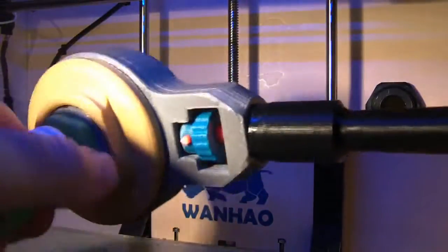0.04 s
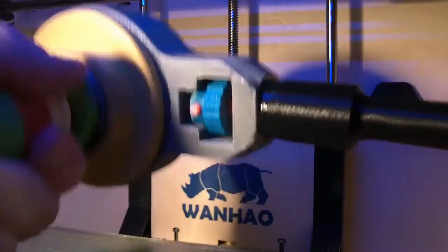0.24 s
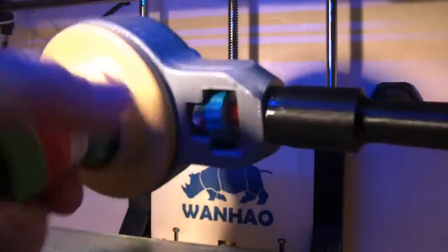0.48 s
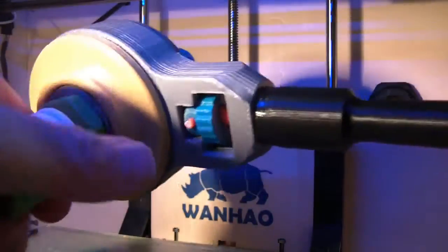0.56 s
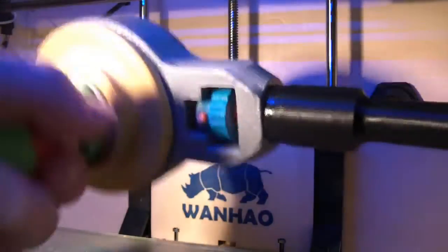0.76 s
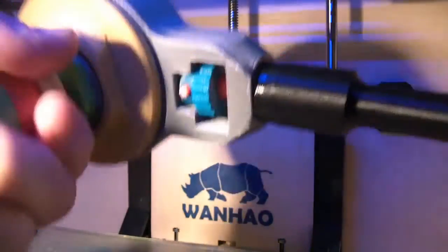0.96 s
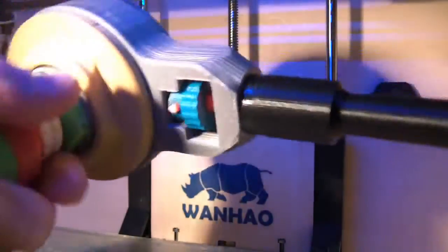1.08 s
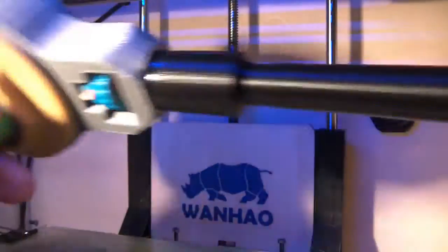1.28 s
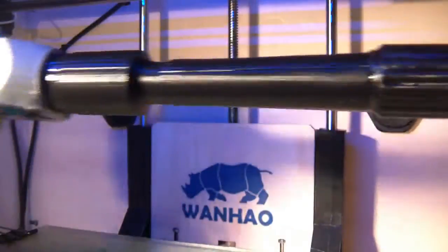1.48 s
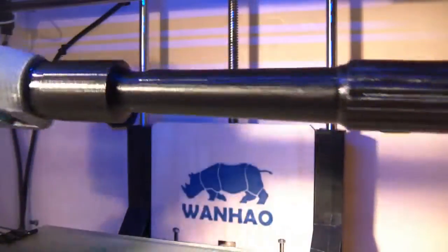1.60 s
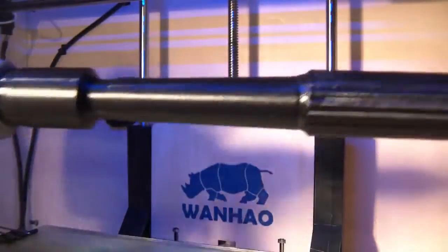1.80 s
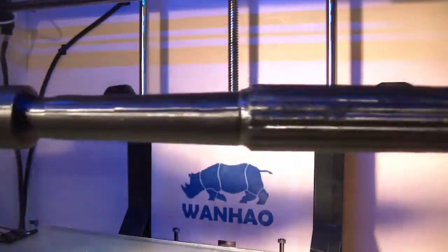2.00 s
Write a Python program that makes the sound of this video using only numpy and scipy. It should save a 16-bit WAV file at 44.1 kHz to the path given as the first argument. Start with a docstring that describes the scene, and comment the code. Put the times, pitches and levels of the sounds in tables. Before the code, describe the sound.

A plastic ratchet wrench clicks very close to the microphone, its loud snaps distorting. After a faint tick near 0.1 seconds, three creaky clacks come at about 0.25, 0.32 and 0.39, with brief rattles. Light ticks follow near 0.5, then three more clacks at 0.85, 0.9 and 0.98. Fan hum, motor whine and rushing air continue throughout and alone afterward, in a small hard room.

```python
"""Plastic ratchet wrench by a small fan

A printed plastic ratchet wrench is turned twice by hand, three teeth each time, in a small hard-walled space.
Slips of the pawl creak up each tooth; then it snaps down, and random impacts chatter on the ringing head.
A cooling fan hums as a stack of wavering tones, a second motor whines, and shaped noise makes moving air.
The wrench is so loud that the microphone overloads."""
import sys
import numpy as np
from scipy import signal
from scipy.io import wavfile
from scipy.ndimage import uniform_filter1d

SR = 44100
rng = np.random.default_rng(int(sys.argv[2]) if len(sys.argv) > 2 else 0)


def store_wav(level_fs):
    """Save 16-bit WAV to argv[1]."""
    pcm = np.round(np.clip(np.atleast_2d(level_fs), -1, 1) * 32767)
    wavfile.write(sys.argv[1], SR, pcm.T.astype(np.int16))


def ratio_of_db(decibels):
    """Turn decibels (scalar or array-like) into linear amplitude factors; 0 dB maps to 1."""
    return 10 ** (np.asarray(decibels, float) / 20)


N = 90404  # samples in the scene, about 2.05 s


def evened(x):
    """Scales a sound to rms 1."""
    return x / np.sqrt(np.mean(x ** 2) + 1e-20)


def read(points, hz):
    """Reads a (frequency, value) table along a logarithmic frequency axis."""
    table_hz, value = np.transpose(points)
    return np.interp(np.log(hz + 1), np.log(table_hz + 1), value)


def add(mix, start_s, sound):
    """Mixes in a two-channel sound from a start time."""
    part = mix[:, round(start_s * SR):][:, :sound.shape[1]]
    part += sound[:, :part.shape[1]]


def drift(top_hz):
    """Slow random wander of rms 1: twelve sines from 0.5 Hz up, the slow ones strongest."""
    t = np.arange(N) / SR
    rates = np.geomspace(.5, top_hz, num=12)
    return evened(sum(np.sin(2 * np.pi * (f * t + rng.random())) / np.sqrt(f) for f in rates))


def lean(db):
    """Gains that make the first channel louder than the second by db."""
    return ratio_of_db(np.array([[db], [-db]]) / 2)


# tones of the fan: (multiple of the shaft rate [1], rms level before wavering and leaning [dB])
FAN_ORDERS = [(1, -42.5), (2, -39.5), (3, -37.5), (4, -39), (5, -44), (7, -49.5), (21, -45.5), (23, -52),
              (24, -67), (28, -51), (30, -46), (36, -52), (42, -52)]


def fan():
    """Blade tones are multiples of one wavering shaft rate; a second motor whines with its octave."""
    shaft_hz, shaft_waver = 136.35, .0004  # waver as a fraction
    level_waver_db, phase_spread, phase_wander = 1.03, .8, 0.38  # phases in radians
    shaft = 2 * np.pi * np.cumsum(shaft_hz * (1 + shaft_waver * drift(8.0))) / SR
    hum = 0
    for k, db in FAN_ORDERS:
        level = ratio_of_db(db + level_waver_db * drift(6.46))
        # each tone also wanders on its own, high ones more
        phase = k * shaft + phase_spread * k * k + phase_wander * np.sqrt(k) * drift(5.57)
        hum = hum + level * np.cos(phase)
    whine_hz, whine_db, octave_db = 906.3, -34.5, -50
    motor = 2 * np.pi * np.cumsum(whine_hz * (1 + 0.00081 * drift(14))) / SR
    whine = ratio_of_db(whine_db + 1.14 * drift(40)) * np.cos(motor) + ratio_of_db(octave_db) * np.cos(2 * motor)
    return np.sqrt(2) * (hum + whine) * lean(-0.34)


# tone colour of the moving air: (frequency [Hz], relative level per hertz [dB])
AIR_COLOUR = [(20, -14), (90, -14.5), (200, -15), (330, -8), (600, -4), (1000, -12.5), (1400, -11),
              (2250, -10.5), (2700, -7.5), (4900, -7), (5200, -12.5), (7500, -21.5), (11000, -25),
              (14000, -27), (15400, -44)]
# how alike the air sounds in both channels: (frequency [Hz], likeness [0 to 1])
AIR_LIKENESS = [(40, 0.98), (100, 0.79), (250, 0.9), (600, 0.94), (1650, 0.98), (4970, 0.71),
                (15000, 0.054)]


def air():
    """Turbulent air is noise, shaped by frequency, with faint drifting patches of loudness."""
    level_db, patch_db = -31, 1.
    frames, hz = N // 512 + 5, np.fft.rfftfreq(2048, 1 / SR)
    a, b, c, d, patches = rng.standard_normal((frames, 1025, 5)).T
    patches = uniform_filter1d(patches, size=20, axis=0)  # smooth over frequency
    patches = evened(uniform_filter1d(patches, size=6, axis=1))  # smooth over time
    alike = np.clip(read(AIR_LIKENESS, hz), -1, 1)[:, None]
    left, other = a + 1j * b, c + 1j * d
    right = alike * left + np.sqrt(1 - alike ** 2) * other
    spectrum = np.array([left, right]) * ratio_of_db(read(AIR_COLOUR, hz)[:, None] + patch_db * patches)
    noise = signal.istft(spectrum, nperseg=2048, noverlap=1536)[1][:, :N]
    return ratio_of_db(level_db) * evened(noise)


def ring(modes, tilt_db):
    """An object struck once rings in many fading modes; each call strikes a new spot, with energy 1."""
    luck_db, split, wide_per_khz = 3.5, .022, .12  # split as a fraction, width in radians per kHz
    # each mode is a loose cluster of three
    hz, db, t60 = np.repeat(modes, repeats=3, axis=0).T[:, :, None]
    t = np.arange(1500) / SR
    luck, detune, turn = rng.standard_normal((len(hz), 3)).T[:, :, None]
    tilt = tilt_db * np.log2(hz / 3000)
    size = ratio_of_db(db + luck_db * luck + tilt - 60 * t / t60) / np.sqrt(t60)
    # opposite phase shifts make the two channels differ
    lag = wide_per_khz * hz / 1000 * turn * np.array([-1, 1])[:, None, None]
    tap = (size * np.sin(2 * np.pi * hz * (1 + split * detune) * t + lag)).sum(1)
    return tap / np.linalg.norm(tap) * np.sqrt(2)


# ringing modes of the wrench head: (frequency [Hz], relative energy [dB], time to fade by 60 dB [s])
HEAD_MODES = [(1615, 3.5, 0.022), (1846, -4, 0.021), (2030, 1.5, 0.013), (2464, 4.5, 0.013),
              (2683, -0.5, 0.016), (3079, 6.5, 0.013), (3484, 1.5, 0.0083), (4023, 6.5, 0.0077),
              (4728, 4, 0.012), (5240, 4.5, 0.0034), (6190, 1, 0.015), (7460, -0.5, 0.025),
              (8980, -8.5, 0.019), (10050, -7, 0.027)]
# loose parts tick: (time [s], relative strength [dB], brightness [dB per octave])
TICKS = [(.1155, -3, -9), (.4822, 3, -3), (.4925, -5, -3)]


def tick(strength_db, tilt_db):
    """A single tap on the head, whose modes all die within 8 ms as the hand damps them."""
    damped = [(hz, db, .008) for hz, db, _ in HEAD_MODES]
    return ratio_of_db(strength_db) * ring(damped, tilt_db)


def impacts(count, per_s, spread_db):
    """Sparse impacts at random moments, of random sign and size."""
    hit = rng.random(count) < per_s / SR
    size = np.minimum(rng.exponential(1, count), 4)
    sign = rng.choice([-1., 1.], count)
    return hit * sign * ratio_of_db(spread_db * size)


def strike(hits, modes, tilt_db, spots):
    """Each hit lands on one of a few spots, and each spot rings the object differently."""
    spot = rng.integers(0, spots, size=len(hits))
    return sum(signal.fftconvolve((hits * (spot == k))[None], ring(modes, tilt_db), axes=1)
               for k in range(spots))


def flurry(length, db, tilt_db, modes):
    """Uneven small impacts swell and fade in one rounded stroke and ring an object."""
    hits = impacts(2000, 1800, 3.5) + 0.11 * rng.standard_normal(2000)  # 1800 per second, plus fine grit
    stroke = np.sin(np.pi * np.clip(np.arange(2000) / SR / length, 0, 1)).clip(0)
    sound = strike(hits * stroke, modes, tilt_db, 4)
    return ratio_of_db(db) * sound / np.linalg.norm(sound) * np.sqrt(2 * length * SR)


# modes of the bent pawl as it slides: (frequency [Hz], relative energy [dB], time to fade by 60 dB [s])
PAWL_MODES = [(1360, 0, 0.0024), (1890, 7.5, 0.0079), (2100, -8, 0.0028), (2660, -9, 0.0071),
              (3400, -5, 0.0023), (4660, -11, 0.0032), (6000, -16, 0.0065), (9400, -21, 0.0024)]
# the pawl creaks up a tooth:
# (time [s], length [s], rms level before the low cut [dB], brightness [dB per octave])
CREAKS = [(.234, 0.011, -11, 2.5), (.243, 0.011, -9.5, -12), (.312, 0.02, -23, -6),
          (.829, 0.026, -9.5, -10), (.889, 0.011, -16, -10), (.954, 0.016, -13.5, -6),
          (.9745, 0.0028, -19, -8)]


def creak(length, db, tilt_db):
    """The pawl slips unevenly up a tooth, and the slips ring the bent pawl."""
    return flurry(length, db, tilt_db, PAWL_MODES)


# the pawl snaps onto a tooth: (time [s], relative strength [dB], chatter length [s],
# brightness [dB per octave], relative ping level [dB], pitch of the tooth [Hz])
SNAPS = [(0.2542, 10.5, 0.015, 4, -20, 3020), (0.3231, 10, 0.013, 1.5, -23.5, 2050),
         (0.3887, 10.5, 0.0081, 0, -36, 2720), (0.8533, 8.5, 0.016, 6, -41, 2800),
         (0.8975, 7, 0.014, 4, -54, 2550), (0.9793, 12.5, 0.012, 2.5, -27.5, 3400)]


def snap(strength_db, length, tilt_db, ping_db, tooth_hz):
    """One big blow, then chatter that sags and settles, makes the head ring, ping and crack."""
    t = np.arange(8000) / SR
    per_s, spread_db, first_blow_db, rise_s = 1100, 4.5, 12, .001
    sag_db, settle_t60 = -8.5, 0.042  # sags during the chatter, then settles
    blows = impacts(8000, per_s, spread_db)
    blows[round(rise_s * SR)] = ratio_of_db(first_blow_db)
    fade_db = sag_db * np.minimum(t / length, 1) - 60 * np.maximum(t - length, 0) / settle_t60
    blows *= np.minimum(t / rise_s, 1) * ratio_of_db(fade_db) * np.sqrt(SR / per_s) / 2

    # each tooth drives the modes near its own pitch hardest
    favour_db, favour_octaves = 5.5, 0.43
    head = []
    for hz, db, t60 in HEAD_MODES:
        distance = np.log2(hz / tooth_hz) / favour_octaves
        head.append((hz, db + favour_db * np.exp(-distance ** 2), t60))
    body = strike(blows, head, tilt_db, 5)[:, :8000]

    ping_hz, ping_t60 = 5378, 0.016
    ping_t = t[:2000]
    ping_tone = ratio_of_db(ping_db - 60 * ping_t / ping_t60) * np.sin(2 * np.pi * ping_hz * ping_t)
    ping = signal.fftconvolve(blows, ping_tone)[:8000]

    # broad crack, strongest at the start
    crack_db, crack_band_hz, crack_t60 = 8, [2100, 10200], 0.013
    crack = signal.lfilter(*signal.butter(2, crack_band_hz, "band", fs=SR), blows)
    crack *= ratio_of_db(-60 * t / crack_t60)
    return ratio_of_db(strength_db) * (body + ping + ratio_of_db(crack_db + tilt_db) * crack)


# the pawl rattles on the head, mostly just after a snap, once just before one:
# (time [s], length [s], rms level before the low cut [dB], brightness [dB per octave])
RATTLES = [(.281, 0.014, -21, 7), (.297, 0.008, -22, 3), (.352, 0.0081, -14.5, -10),
           (.417, 0.0034, -23, -4), (.845, 0.0096, -17, -9), (.875, 0.016, -18, -10),
           (.916, 0.008, -15, -3), (1.001, 0.018, -21, 5), (1.016, 0.011, -25.5, -4)]


def rattle(length, db, tilt_db):
    """The pawl rattles in a short flurry of impacts that ring the head."""
    return flurry(length, db, tilt_db, HEAD_MODES)


# how fast the room tail dies: (frequency [Hz], time to fade by 60 dB [s])
ROOM_FADE = [(500, 0.26), (1500, 0.36), (3500, 0.32), (6000, 0.26), (10000, 0.13)]


def room(x):
    """Hard walls return four near reflections and a short tail of echoes that dies by band."""
    tail_db, alike, near_db = -22.5, 0.85, -7.5  # alike: likeness of the two channels, 0 to 1
    # one echo of random sign in every 20 samples
    taps = np.zeros((3, SR // 2))
    at = np.arange(300, SR // 2 - 20, 20)
    where = at + rng.integers(0, 20, (3, len(at)))
    np.put_along_axis(taps, where, rng.choice([-1., 1.], (3, len(at))), 1)
    hz, t, z = signal.stft(taps, SR, nperseg=256)
    tail = signal.istft(z * ratio_of_db(-60 * t / read(ROOM_FADE, hz)[:, None]), SR, nperseg=256)[1]
    mixed = alike * tail[0] + np.sqrt(1 - alike ** 2) * tail[1:]
    echoes = ratio_of_db(tail_db) * mixed / np.linalg.norm(tail[0])
    # near reflections reach the two channels up to 3 samples apart
    near = rng.integers(8, 200, size=4) + rng.integers(0, 4, size=(2, 4))
    np.put_along_axis(echoes, near, ratio_of_db(near_db) / 2 * rng.choice([-1., 1.], size=(1, 4)), 1)
    return signal.fftconvolve(x[None], echoes, axes=1)[:, :N]


def scene():
    """The wrench, direct and through the room, over the steady fan and air."""
    wrench = np.zeros((2, N))
    for table, source in ((TICKS, tick), (CREAKS, creak), (SNAPS, snap), (RATTLES, rattle)):
        for start_s, *settings in table:
            add(wrench, start_s, source(*settings))
    # low cut in Hz: the small head radiates no bass
    wrench = signal.lfilter(*signal.butter(4, 1435, "high", fs=SR), wrench)
    return wrench * lean(-1.1) + room(wrench.mean(0)) + fan() + air()


def band_limit(x):
    """A steep low-pass at the top of the band."""
    return signal.sosfilt(signal.butter(12, 15600, fs=SR, output="sos"), x)


def record(dry):
    """The microphone overloads with a fairly hard knee, then the treble rolls off."""
    ceiling, knee = 0.87, 3.5  # full scale is 1; a higher knee bends more sharply
    clipped = dry / (1 + abs(dry / ceiling) ** knee) ** (1 / knee)
    finished = signal.lfilter(*signal.butter(3, 14900, fs=SR), clipped)  # roll-off in Hz
    return band_limit(finished)


dry = scene()
out = record(dry)
store_wav(out)
```